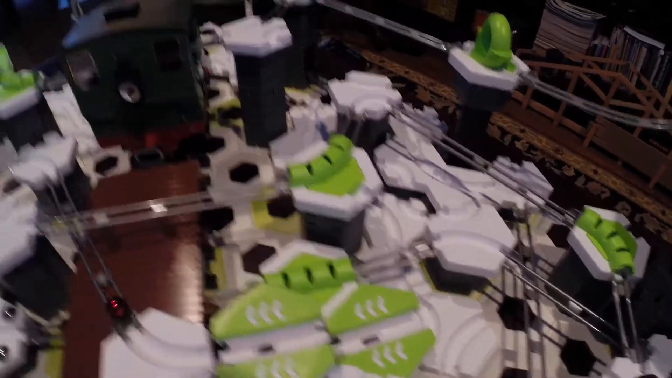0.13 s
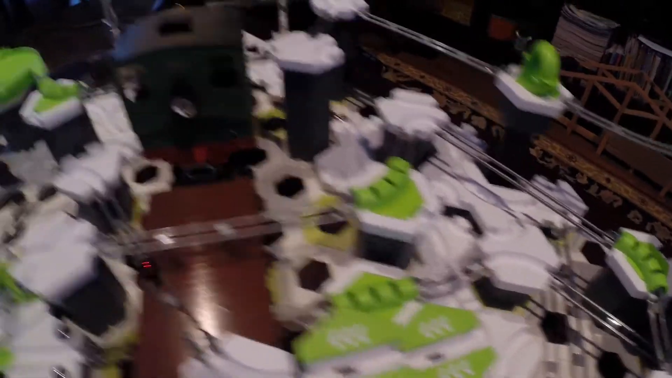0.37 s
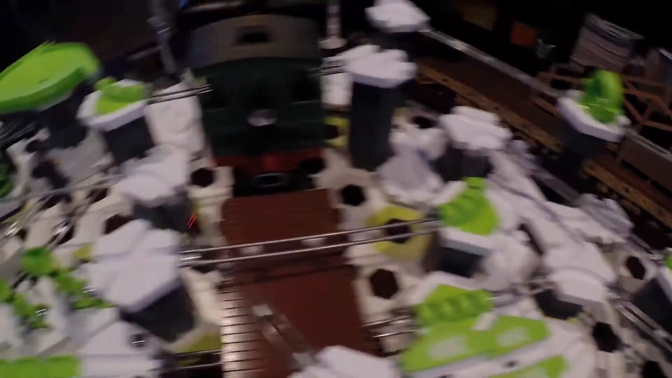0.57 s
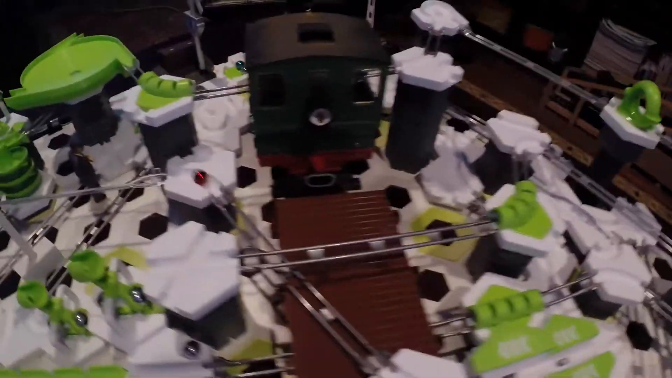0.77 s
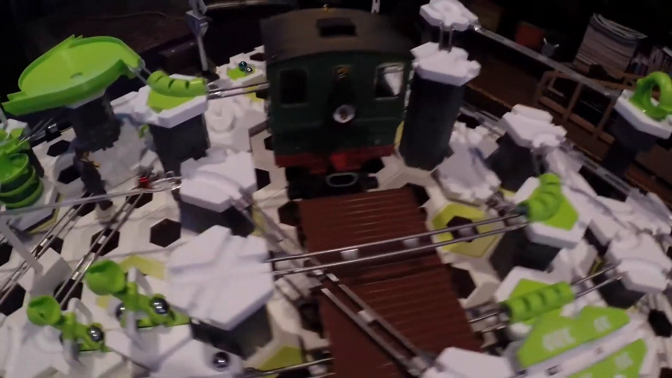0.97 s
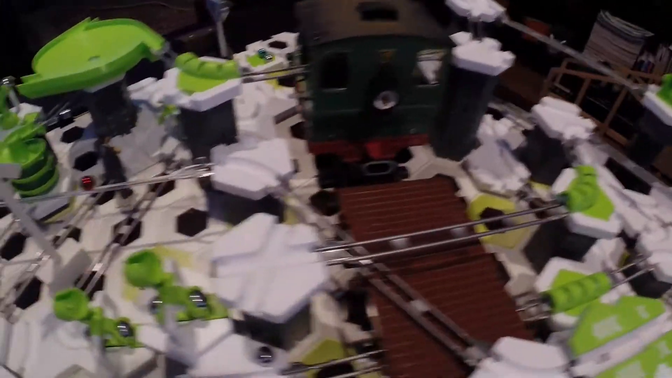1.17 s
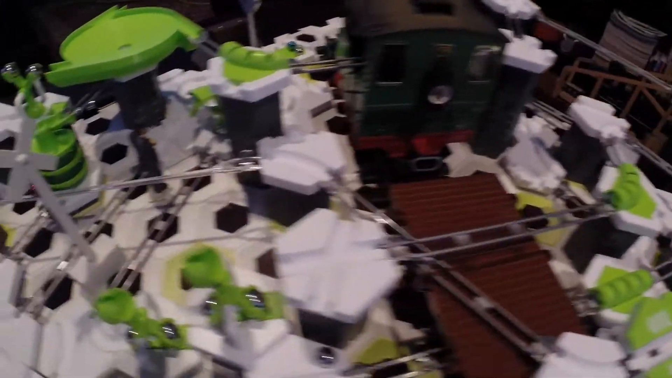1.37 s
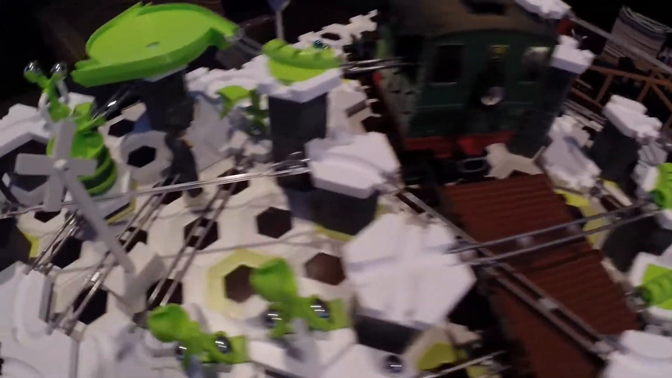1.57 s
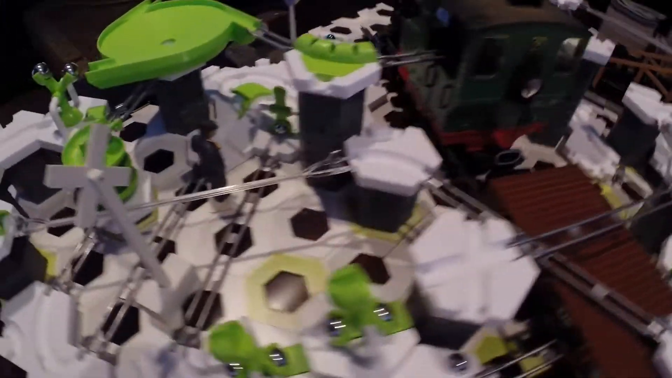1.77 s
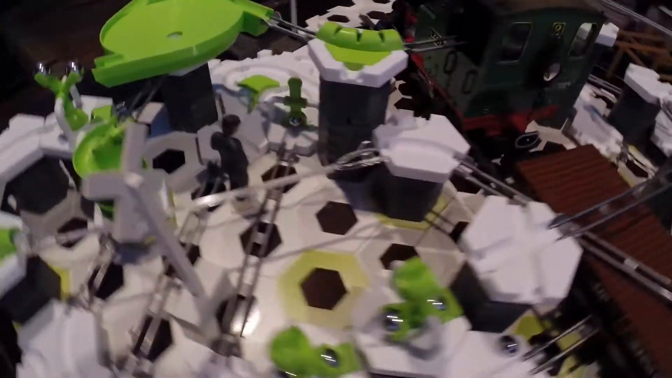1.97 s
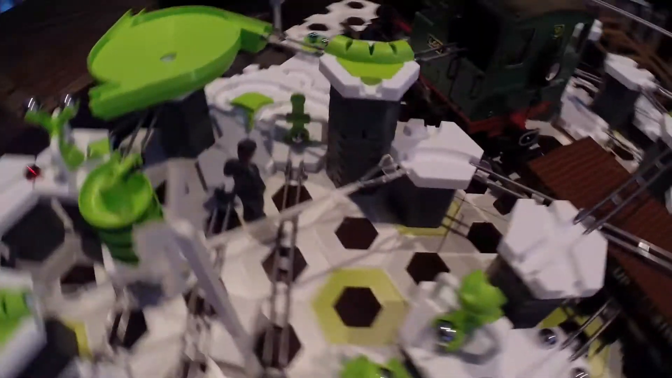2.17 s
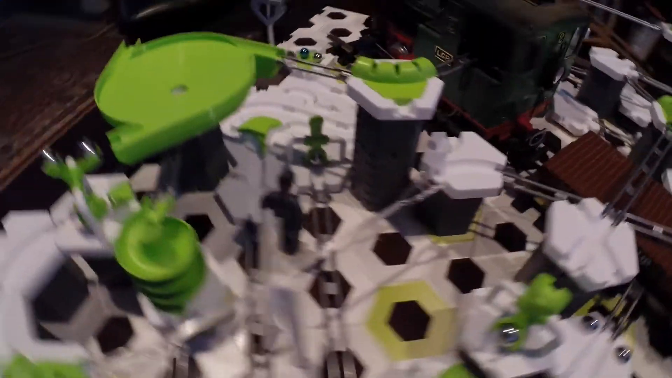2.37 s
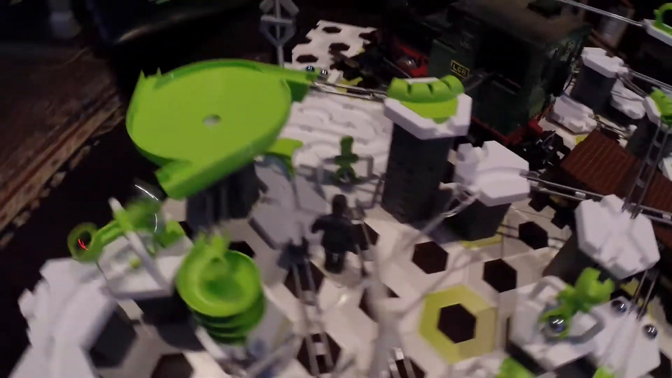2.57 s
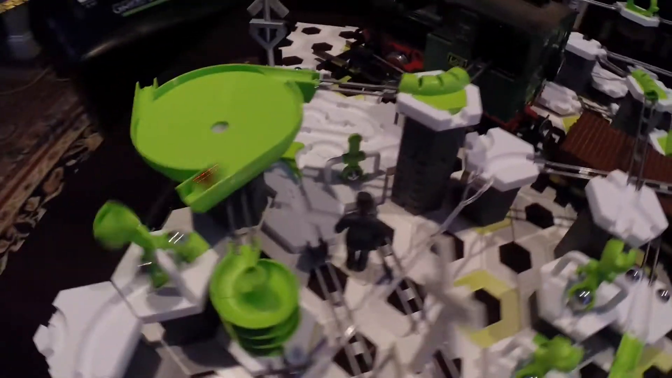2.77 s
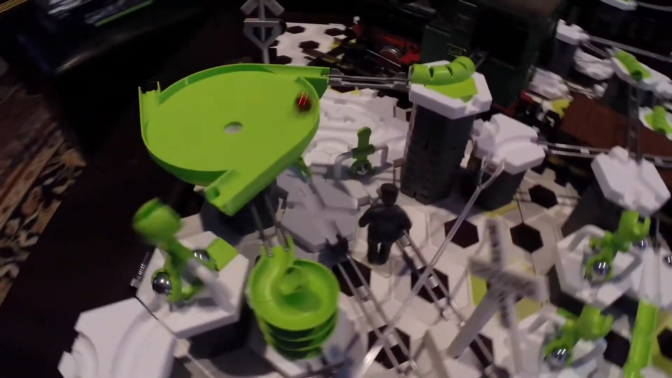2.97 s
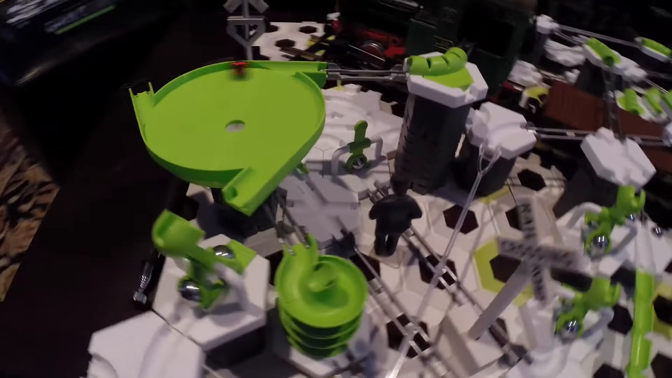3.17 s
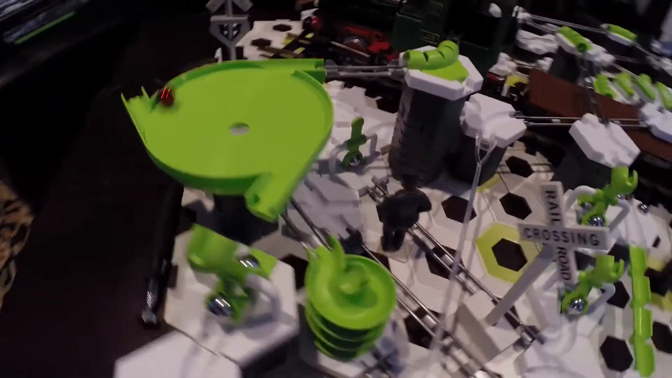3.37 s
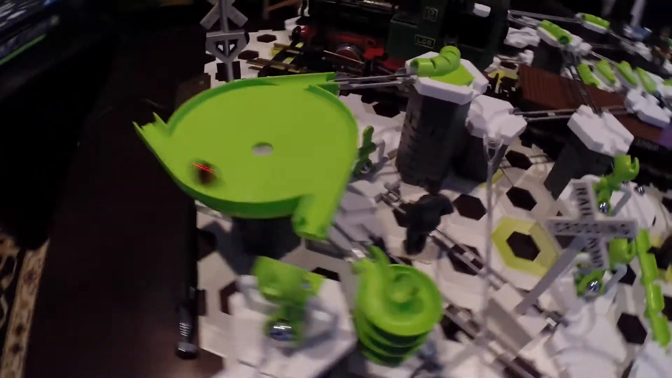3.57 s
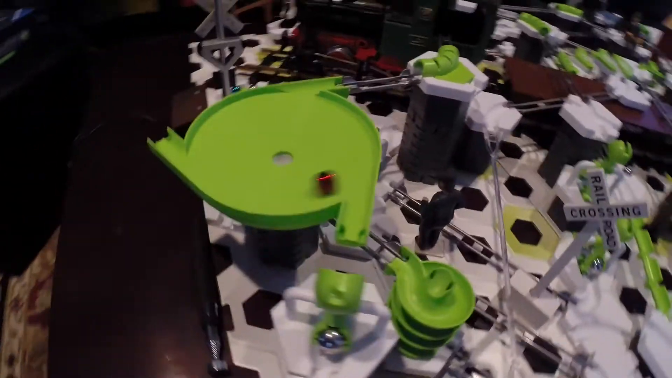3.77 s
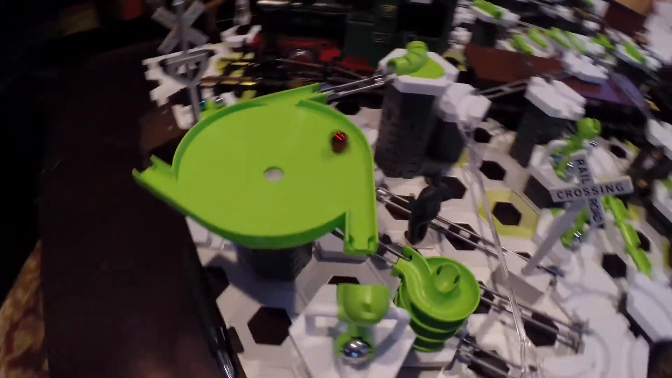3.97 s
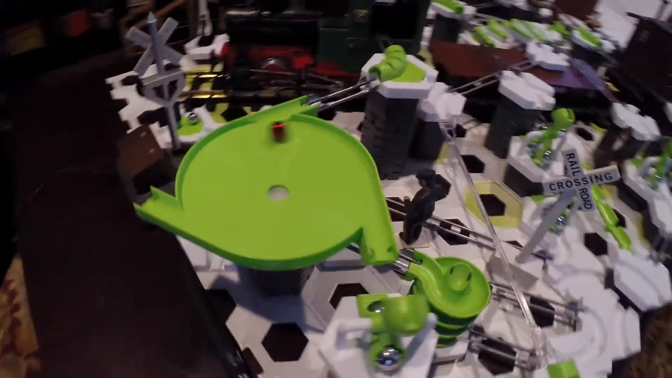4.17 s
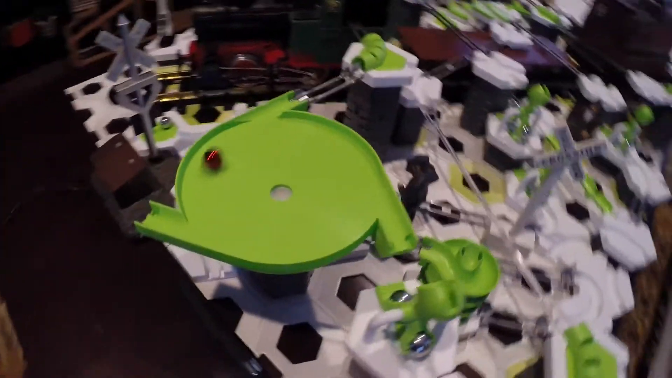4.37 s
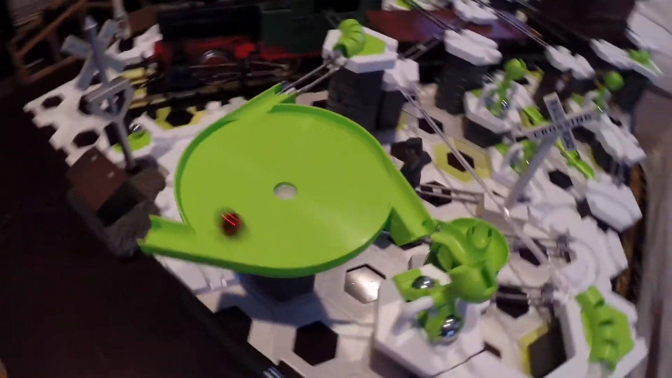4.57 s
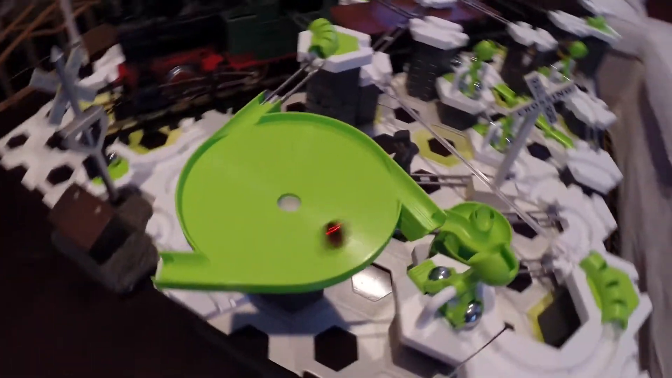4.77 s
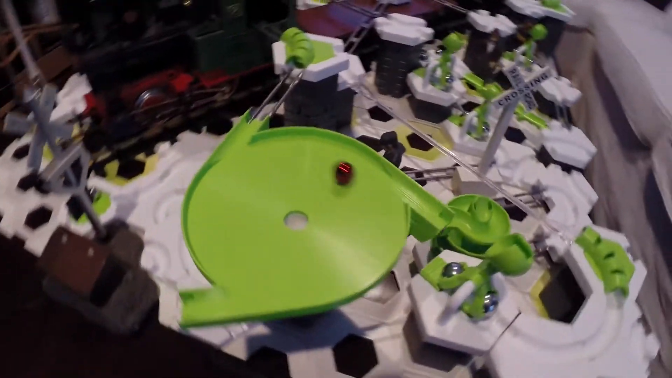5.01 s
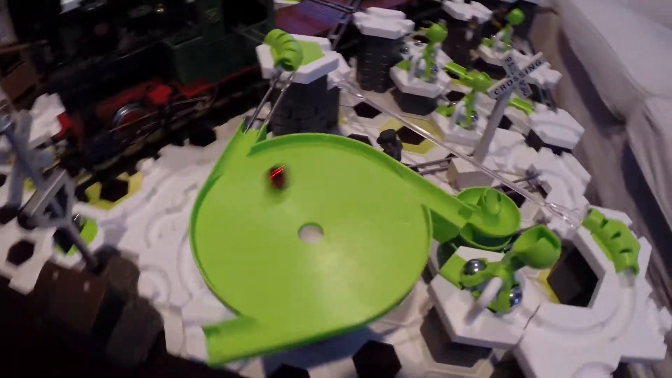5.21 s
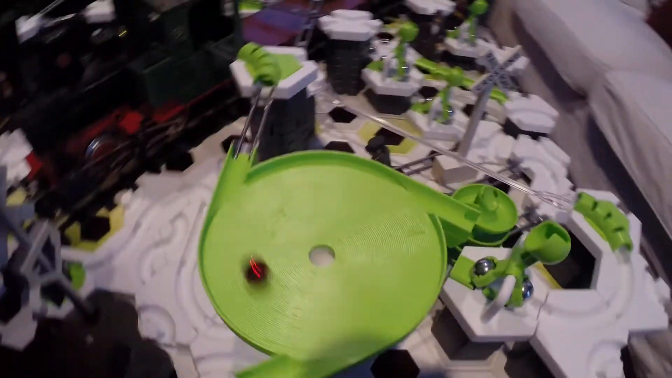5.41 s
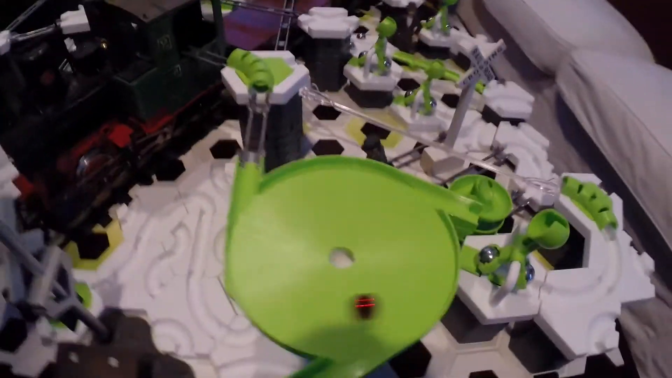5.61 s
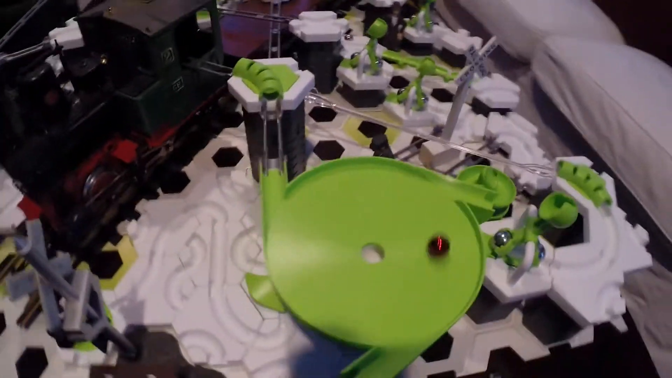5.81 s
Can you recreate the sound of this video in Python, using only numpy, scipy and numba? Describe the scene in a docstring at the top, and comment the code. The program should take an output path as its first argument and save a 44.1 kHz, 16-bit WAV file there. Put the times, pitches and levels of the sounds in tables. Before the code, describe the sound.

A marble rumbles softly along the steel rails of a plastic run, clicking over the joints. It trips a launcher with a sharp clack of steel balls, then lands loudly in a wide plastic bowl. There it circles with a whirr and a thin, swelling ring, knocking against the rim and rattling over bumps. Heard from close by in a quiet, furnished room.

```python
"""Marble run into a plastic bowl

A marble rumbles along the rails of a plastic run, clicks over the joints and trips a launcher with
clacking steel balls. It lands hard in a wide plastic bowl and circles there in a rapid train of tiny
hops that make the thin shell whirr and ring, with knocks and rattles where it meets the rim and bumps.
Heard from close by in a quiet, furnished room."""
import sys
import numpy as np
from scipy import signal
from scipy.fft import rfft, irfft
from scipy.io import wavfile
from scipy.ndimage import uniform_filter1d
from numba import njit

SR = 44100
rng = np.random.default_rng(int(sys.argv[2]) if len(sys.argv) > 2 else 0)


def wav_record(signal):
    """Record a signal, one row per channel, as 16-bit PCM in the file named by sys.argv[1]."""
    frames = np.transpose(np.atleast_2d(signal))
    bounded = np.clip(frames, -1, 1)
    # unit amplitude maps onto the largest positive 16-bit level
    quanta = np.round(bounded * 32767).astype(np.int16)
    wavfile.write(sys.argv[1], SR, quanta)


N = 257984
TIME = np.arange(N) / SR
RING_TIME = TIME[:SR // 4]

# bed of still air: pitch_hz, level_db
ROOM_TONE_EQ = [(12, -35), (20, 4), (133, 0), (427, -8), (746, -18), (811, -17), (932, -11.5), (1270, -8.5),
                (1580, -13), (2270, -18.5), (5530, -24), (12400, -38), (15500, -41)]
# faders for the roll along the track: time_s, rumble_db, singing_db, chatter_db
TRACK_FADERS = [(0.0, -53, -52.5, -82), (0.32, -64.5, -56.5, -68), (0.63, -61.5, -50.5, -62),
                (0.84, -50, -47, -58), (0.99, -64.5, -65.5, -64), (1.4, -63.5, -68.5, -63),
                (1.67, -64.5, -66, -61), (1.84, -53, -70, -56), (2.07, -52, -77, -82),
                (2.28, -49.5, -70, -71), (2.41, -55, -71, -46.5), (2.55, -60, -77, -73),
                (2.77, -61, -68.5, -69), (2.8, -58, -72, -65)]
# hollow rumble of the plastic tiles: pitch_hz, level_db
TILE_EQ = [(60, -15), (130, -2), (200, -15), (350, 0.5), (520, 0.5), (820, 3), (1050, -3), (1500, -1),
           (2200, -12), (5000, -37), (15000, -57)]
# singing of the steel rails: pitch_hz, level_db, t60_s
RAIL_MODES = [(831, 3.5, 0.15), (2065, -23, 0.1), (2130, 22, 0.019), (2270, 17.5, 0.025), (2470, 2, 0.1),
              (2696, 14.5, 0.051), (2700, -8, 0.089)]
# bright chatter on the rails: pitch_hz, level_db
CHATTER_EQ = [(1500, 0), (3000, 2), (4100, 2.5), (4900, 0), (5200, -12), (5600, 1), (6300, -15),
              (9000, -20), (15000, -39)]
# clicks at joints and tiles: start_s, peak_db, pitch_hz, tick_db, knock_db
TRACK_CLICKS = [(0.0184, -39, 2300, -28, 8), (0.0549, -38, 2320, -30, 8), (0.144, -30.5, 4240, -36, -6),
                (0.172, -40.5, 2650, -28, -13), (0.241, -24.5, 2550, -20, -15),
                (0.256, -29.5, 2460, -25, -3), (0.273, -33, 2630, -34, -4), (0.3547, -37.5, 2300, -30, -10),
                (0.4683, -41, 2300, -29, -8), (0.494, -39, 2540, -26, 0), (0.522, -33.5, 2130, -28, 1.5),
                (0.569, -41, 2300, -26, -2), (0.666, -39.5, 2250, -28, -7), (0.725, -23, 2440, -20, -11),
                (0.73, -22, 2250, -24, -8.5), (0.748, -24.5, 2700, -22, -9), (0.7844, -31.5, 2560, -23, -2),
                (0.939, -29.5, 2130, -11.5, -2.5), (0.944, -27.5, 2740, -18, -5),
                (1.04, -42.5, 2700, -8, -11), (1.3, -44, 2500, -7, -8), (1.646, -35, 1900, -20, -6),
                (1.679, -31, 2670, -20, -1.5), (1.734, -41, 2940, -17, -10), (1.766, -34.5, 2700, -21, -10),
                (1.801, -29, 2510, -17.5, -6), (1.838, -36, 1620, -20, -3), (2.034, -33.5, 1760, -22, 3.5),
                (2.088, -39.5, 1880, -25, 3), (2.173, -41, 1800, -20, 8), (2.245, -28.5, 3750, -25, 1.5),
                (2.261, -27.5, 2000, -15.5, 0), (2.514, -27.5, 1140, -22, -2), (2.561, -38, 3450, -8, 1),
                (2.765, -36, 2520, -7, 2.5), (2.776, -33.5, 3300, -9, -2)]
# low knock and bright tick of plastic parts: pitch_hz, level_db
KNOCK_EQ = [(50, -7.5), (150, 8.5), (350, -3.5), (600, 5.5), (1200, 3.5), (1800, -11), (4000, -42.5)]
TICK_EQ = [(3000, -22), (5000, -2), (7000, 0), (9000, -7), (11000, -16), (16000, -22)]

# clacks of the launcher and its steel balls: start_s, peak_db, ring_db, base_db
LAUNCHER_CLACKS = [(2.3602, -24, -11, 0), (2.364, -25.5, 0, -9), (2.381, -31, -7, -3),
                   (2.3894, -9.5, -16, -19.5), (2.409, -23.5, 2, -1.5), (2.429, -33, -1, 5),
                   (2.505, -30, -4, -12), (2.541, -33.5, -2, 0), (2.548, -31, 1, 1),
                   (2.7261, -22, -1.5, -13)]
# ring of the launcher: pitch_hz, level_db, t60_s
LAUNCHER_MODES = [(2300, -2, 0.04), (2480, 8.5, 0.027), (3220, 2, 0.067), (3450, 6, .04), (3700, 5, 0.075),
                  (3900, 0, 0.18), (4200, -3, 0.03), (4600, 1, .04), (4950, 2.5, 0.04), (5700, -2, .04),
                  (6300, -3, 0.039), (6720, 5.5, 0.022)]
# its hard crack and the thump of its base: pitch_hz, level_db
CRACK_EQ = [(200, -30), (800, -16), (2600, -6.5), (3900, 16.5), (5200, -12), (7000, -8), (12000, -38)]
THUMP_EQ = [(60, -7), (160, 4.5), (320, 2.5), (440, 7.5), (600, 1.5), (900, -5.5), (1600, -10),
            (3500, -24), (10000, -50)]

# the landing and its rebounds: start_s, peak_db
LANDING_HITS = [(2.8114, -.8), (2.8203, -10.5), (2.8315, -16)]
# ring of the bowl by where it is struck: pitch_hz, t60_s, inlet_db, outer_db, inner_db
BOWL_MODES = [(795, 0.2, -45, -4, -8), (947, 0.23, -7.5, 1, -13), (1190, 0.097, -24, -20, -23),
              (1600, 0.017, -6, -27, -27), (1702, 0.13, -8, -7.5, -6.5), (1744, 0.075, 5, -7.5, -11.5),
              (2150, 0.026, -26, -1, -3), (2471, 0.079, -14.5, 23.5, 7.5), (2584, 0.033, -27, 18, 21.5),
              (2700, 0.047, 4, 19, 8), (2750, 0.044, -15, 0, -7), (2840, 0.064, 5, 2, 2),
              (2992, 0.032, -1, 12.5, 20), (3118, 0.05, -6, 2, -1.5), (3296, 0.055, -20, 3, 7.5),
              (3534, 0.073, 11, 5, -9), (3552, 0.059, 5, -2, -9), (3750, 0.061, -43, -25, 1),
              (4200, 0.068, -3, -5.5, -0.5), (4370, 0.059, -1, -0.5, -22), (4430, 0.072, -10, -6.5, -17.5),
              (4700, 0.041, -19, -28, -41), (5310, 0.037, -28, -17, -5), (5450, 0.058, -24, -20, -25),
              (5770, 0.041, -32, -19, -39), (6030, 0.056, -34, -16.5, -21), (6780, 0.059, -26, -20.5, -13),
              (7560, 0.043, -4, -26, -35), (8600, 0.027, -25, -24, -34)]
# the wall flexing at the point of impact: pitch_hz, level_db, t60_s
FLEX_MODES = [(865, -12, 0.09), (1250, -38, 0.014), (2470, -29, .012), (3120, 18.5, 0.02),
              (4410, 19.0, 0.014)]
# how hard the marble presses on the bowl as it climbs and dips: time_s, force_db
BOWL_FORCE = [(2.87, 1), (2.94, 3), (2.98, 0), (3.07, 5.5), (3.18, 0.5), (3.21, 6), (3.33, 4.5),
              (3.43, 0.5), (3.47, -6), (3.54, 2), (3.72, 0), (3.75, -5), (3.79, 1.5), (3.86, 4), (3.92, -1),
              (4.04, -6.5), (4.09, 0.5), (4.22, -4.5), (4.26, 2), (4.3, -5.5), (4.34, 5), (4.4, -4),
              (4.45, -4.5), (4.49, 1), (4.59, -5), (4.69, -6), (4.77, 1), (4.93, -1), (4.96, 4.5),
              (5.05, 4.5), (5.13, -4), (5.17, -3), (5.2, 2), (5.47, -0.5), (5.54, 2), (5.64, -1),
              (5.69, -7), (5.76, -0.5), (5.85, 1.5)]
# its way round the bowl: time_s, position_laps
BOWL_LAPS = [(2.81, 0.2), (2.9, 0.37), (3.13, 0.63), (3.48, 0.92), (3.85, 1.38), (4.23, 1.6), (4.61, 1.7),
             (4.92, 2.33), (5.29, 2.84), (5.65, 3.2), (5.85, 3)]
# the short push that each contact radiates directly: pitch_hz, level_db
PUSH_EQ = [(40, -27), (100, -21), (140, 7.5), (195, -10.5), (240, -8), (300, -11.5), (520, -5), (950, 2.5),
           (1400, -11), (2000, -15), (3000, -8.5), (4200, -22.5), (6000, -37), (16000, -71.5)]
# the shell's four mode families: low_hz, high_hz
FAMILY_BANDS = [(1600, 2000), (2000, 3000), (3000, 4800), (4800, 9000)]
# fader for the lowest family, a thin tone near 1.7 kHz: time_s, level_db
LOW_RING_FADER = [(2.87, -50), (2.89, -54), (3.02, -38), (3.08, -54), (3.19, -50), (3.21, -41.5),
                  (3.34, -42.5), (3.38, -55), (3.55, -57), (3.63, -41), (3.81, -54.5), (4.11, -43.5),
                  (4.2, -55), (4.49, -49), (4.59, -63), (4.8, -41), (4.94, -54), (5.03, -41), (5.23, -46),
                  (5.27, -51), (5.42, -43.5), (5.55, -45), (5.57, -56), (5.68, -60), (5.74, -44.5),
                  (5.85, -44)]
# how each higher family answers the marble: level_db, db_per_force_db, drift_db_per_s, nodal_line_db
FAMILY_RESPONSE = [(-42, 1.2, -.5, -2), (-48.5, 1.65, -.5, -0.5), (-61.5, 1.7, 0, -2)]
# the marble damps the shell, one value a family: t60_ratio
FAMILY_RING_KEPT = [1, .85, .55, .7]
# how far the marble's weight bends the pitch, one value a family: detune_share
FAMILY_DETUNE = [0.072, .25, 0.12, 0.086]
# dense, short ring of the bowl's high modes: pitch_hz, level_db
SHELL_EQ = [(1500, -56), (2600, 26), (3300, 13), (4300, 6.5), (5000, -16), (7000, -3), (8800, -33),
            (10000, -63), (15000, -54)]
# fine hiss of the running surface: pitch_hz, level_db
HISS_EQ = [(3000, -37), (4500, 5), (5400, -1), (6200, -2), (7200, -7), (8700, -11.5), (9800, -33),
           (15000, -22)]
# sharp little ticks under the marble: start_s, peak_db, top_treble_db
BOWL_TICKS = [(2.943, -32, -16), (3.044, -29.5, -14), (3.07, -23.5, -14), (3.18, -45, 13),
              (3.206, -30, -13), (3.406, -39, -10), (4.4414, -42, 12)]
# knocks on the rim and on bumps: start_s, peak_db
BOWL_KNOCKS = [(3.0471, -28), (3.06, -26), (3.0815, -19), (3.2052, -22), (3.2195, -14), (3.252, -25),
               (3.275, -26), (3.835, -15), (3.8777, -22), (3.93, -25), (3.948, -28), (4.0856, -23.5),
               (4.113, -25), (4.2428, -30), (4.267, -29), (4.3461, -22), (5.0365, -24), (5.0903, -28),
               (5.147, -27), (5.213, -26)]
# runs of even bounces: start_s, length_s, gap_s, first_peak_db, last_peak_db, tilt_db_per_octave
BOWL_RATTLES = [(3.8425, .058, .0048, -22, -28, 0), (4.9503, .108, .005, -22, -22, 7)]
# tail returned by furniture and walls: pitch_hz, level_db
REVERB_EQ = [(60, -22.5), (300, 1.5), (3000, -6.0), (7000, -9.0), (15000, -4.0)]

SPIRAL_S = [3.67, 4.9]  # the marble passes from the outer surface to the inner
NODAL_LINES, LOBE_SHARPNESS = 3, 0.97  # sharper lobes make narrower swells between the lines
HOP_HZ, HOP_JITTER, HOP_SAG_PER_S = 399.3, .33, .15  # base values; the rate sags as the marble slows
DETUNE_START, DETUNE_PER_S, DETUNE_LAP_SWING = -0.032, 0.02, 0.011  # each family takes its share


def undb(db):
    """Decibels to gain."""
    return np.exp(np.asarray(db) * (np.log(10) / 20))


def unit(x):
    """Scale to rms 1."""
    return x / np.sqrt(np.mean(x ** 2))


def peaked(x, db):
    """Scale to a peak level."""
    return x * undb(db) / np.abs(x).max()


def steady(x, window_s):
    """Ride the gain to hold rms near 1 in every short stretch."""
    return x / np.sqrt(uniform_filter1d(x ** 2, int(window_s * SR)) + 1e-12)


def faders(table):
    """Each dB column of a table as a gain for every sample."""
    times, *columns = np.transpose(table)
    return [undb(np.interp(TIME, times, column)) for column in columns]


def wander(rate_hz):
    """Random drift with rms 1."""
    knots = np.arange(0, TIME[-1] + 1 / rate_hz, 1 / rate_hz)
    return unit(np.interp(TIME, knots, rng.standard_normal(len(knots))))


def add(out, start_s, sound):
    """Mix a sound in at its cue."""
    start = max(int(start_s * SR), 0)
    out[start:start + len(sound)] += sound[:N - start]


def through(x, response):
    """Play x through an impulse response."""
    return signal.fftconvolve(x, response)[:len(x)]


def colour(eq, size=4096):
    """Minimum-phase impulse response of an EQ curve."""
    hz, db = np.transpose(eq)
    bins_hz = np.fft.rfftfreq(size, 1 / SR)
    log_gain = np.log(undb(np.interp(np.log(bins_hz + 1), np.log(hz), db)))
    cepstrum = irfft(log_gain)
    cepstrum[1:size // 2] *= 2
    cepstrum[size // 2 + 1:] = 0
    return np.pad(irfft(np.exp(rfft(cepstrum))), (0, len(RING_TIME) - size))


def fade(t60):
    """Exponential decay, 60 dB down after t60 seconds."""
    return np.exp(-np.log(1000) * RING_TIME / t60)


def burst(eq, t60):
    """Many close modes dying together: a coloured, decaying noise."""
    return unit(through(rng.standard_normal(len(RING_TIME)) * fade(t60), colour(eq)))


def ring(modes):
    """A struck body: one decaying sine for each mode."""
    return sum(undb(db) * fade(t60) * np.sin(2 * np.pi * hz * RING_TIME) for hz, db, t60 in modes)


def soften(x, hz):
    """Plastic yields, so a contact lasts a moment and loses its top."""
    return signal.sosfilt(signal.butter(2, min(hz, .45 * SR), fs=SR, output="sos"), x)


def room_tone():
    """Still air lays a faint, dark bed of noise under everything."""
    return undb(-57.5) * unit(through(rng.standard_normal(N), colour(ROOM_TONE_EQ)))


def hops(rate_hz, jitter, scatter_db, grit_db):
    """A rolling marble leaves the surface and falls back again and again; fine grit fills the gaps."""
    phase = np.cumsum(rate_hz * np.exp(jitter * wander(400))) / SR
    contacts = np.diff(np.floor(phase), prepend=0) * undb(scatter_db * np.tanh(wander(167)))
    return unit(contacts) + undb(grit_db) * rng.standard_normal(N)


def track_roll(end_s=2.56):
    """The marble rumbles over hollow tiles and makes the steel rails sing and chatter."""
    tile_gain, rail_gain, chatter_gain = faders(TRACK_FADERS)
    lumps = undb(2.5 * np.tanh(wander(45)))
    contacts = steady(hops(220, jitter=.6, scatter_db=8, grit_db=-3), window_s=.09) * lumps
    contacts *= np.interp(TIME - end_s, [0, .05], [1, 0])
    rumble = undb(-3) * tile_gain * unit(through(contacts, colour(TILE_EQ)))
    singing = undb(-3) * rail_gain * unit(soften(through(contacts, ring(RAIL_MODES)), hz=4500))
    grit = through(contacts, fade(0.037)) * rng.standard_normal(N)
    chatter = undb(-3.5) * chatter_gain * unit(through(grit, colour(CHATTER_EQ)))
    return rumble + singing + chatter


def track_clicks():
    """Each joint or tile answers with a snap, a ping at its own resonance, a low knock and a tick."""
    out = np.zeros(N)
    for start_s, peak_db, hz, tick_db, knock_db in TRACK_CLICKS:
        body_eq = [(hz / 6, -25), (hz / 2.84, -8), (hz, 0), (hz * 1.53, -6), (hz * 2, -4),
                   (hz * 3, -22), (hz * 5, -38)]
        ping = undb(-5) * unit(ring([(hz * .96, -3, .03), (hz * 1.03, 0, .04), (hz * 2.1, -3, .035)]))
        snap = burst(body_eq, t60=0.028) + undb(-5) * burst(body_eq, t60=0.1)
        knock = undb(knock_db) * burst(KNOCK_EQ, t60=0.092)
        tick = undb(tick_db) * burst(TICK_EQ, t60=0.11)
        add(out, start_s, peaked(soften(snap + ping, hz=4870) + knock + tick, peak_db))
    return out


def launcher():
    """Steel and plastic clack: a hard crack, a ring near 4 kHz, and a thump and a tick in the base."""
    out = np.zeros(N)
    for start_s, peak_db, ring_db, base_db in LAUNCHER_CLACKS:
        modes = [(hz, db + 2 * rng.standard_normal(), t60) for hz, db, t60 in LAUNCHER_MODES]
        crack = soften(burst(CRACK_EQ, t60=0.0069), hz=5200)
        base = burst(THUMP_EQ, t60=0.1) + undb(-9.5) * burst(TICK_EQ, t60=0.17)
        clack = crack + undb(ring_db) * unit(ring(modes)) + undb(base_db) * base
        add(out, start_s, peaked(clack, peak_db))
    return out


def disperse(x, hz, width_hz):
    """Bending waves smear a blow over a few cycles: an all-pass holds back the band around hz."""
    radius = np.exp(-np.pi * width_hz / SR)
    poles = np.array([1, -2 * radius * np.cos(2 * np.pi * hz / SR), radius ** 2])
    return signal.lfilter(poles[::-1], poles, x)


def thin_out(x):
    """The small open shell radiates little bass."""
    return signal.sosfilt(signal.butter(3, 600, "high", fs=SR, output="sos"), x)


def bowl_landing():
    """The landing flexes the wall, rings the whole bowl and thuds faintly in the tower beneath."""
    out = np.zeros(N)
    inlet = unit(ring([(hz, db, t60) for hz, t60, db, *_ in BOWL_MODES]))
    flex = unit(disperse(unit(ring(FLEX_MODES)), hz=3300, width_hz=530))
    shell = thin_out(soften(inlet + undb(2.5) * flex, hz=6500))
    tick = undb(-21) * burst(TICK_EQ, t60=0.11)
    thud = undb(-24.5) * burst([(50, -12), (130, 7), (220, -3), (500, -16), (1500, -35)], t60=0.17)
    for start_s, peak_db in LANDING_HITS:
        add(out, start_s, peaked(shell + tick + thud, peak_db))
    return out


def bouncing(settle_s):
    """A knock sets the marble bouncing: 1 at the hit, dying away as it settles."""
    knocks_s = np.array([0] + [start_s for start_s, _ in BOWL_KNOCKS])
    latest_s = knocks_s[np.searchsorted(knocks_s, TIME, "right") - 1]
    return np.exp(-(TIME - latest_s) / settle_s)


def surface_grip(flight_s, duck_db):
    """A gain that ducks before each knock and through each rattle, as the marble is thrown clear."""
    grip = np.ones(N)
    flights = [(s - flight_s, s) for s, _ in BOWL_KNOCKS]
    flights += [(s - flight_s, s + length_s) for s, length_s, *_ in BOWL_RATTLES]
    for start_s, end_s in flights:
        grip[int(start_s * SR):int(end_s * SR)] = undb(duck_db)
    return uniform_filter1d(grip, size=128)


@njit
def resonate(x, hz, t60):
    """One mode whose pitch may glide while it rings."""
    y, state, pole = np.empty(len(x)), 0j, 0j
    for i in range(len(x)):
        if i % 16 == 0:
            pole = np.exp((2j * np.pi * hz[i] - np.log(1000) / t60) / SR)
        state = state * pole + x[i]
        y[i] = state.imag
    return y


def family_swells(force, grip, laps, age_s):
    """A gain per mode family: the lowest rides its fader, the rest follow force and nodal lines."""
    antinode = (np.sin(np.pi * NODAL_LINES * laps) ** 2) ** LOBE_SHARPNESS
    gains = [undb(1) * faders(LOW_RING_FADER)[0]]
    for db, growth, db_per_s, node_db in FAMILY_RESPONSE:
        lobes = np.sqrt(antinode + undb(node_db) ** 2 * (1 - antinode))
        gains.append(grip * undb(db + db_per_s * age_s) * force ** growth * lobes)
    return gains


def shell_ring(contacts, gains, laps, age_s):
    """Hops ring the shell; the marble's weight detunes it, steadily as it spirals in and once a lap."""
    out = np.zeros(N)
    inward = np.interp(TIME, SPIRAL_S, [0, 1])
    detune = 1 + DETUNE_START + DETUNE_PER_S * age_s + DETUNE_LAP_SWING * np.cos(2 * np.pi * laps)
    for gain, (low_hz, high_hz), share, kept in zip(gains, FAMILY_BANDS, FAMILY_DETUNE, FAMILY_RING_KEPT):
        tuning = detune ** share * (1 + 0.006 * wander(25))
        family = np.zeros(N)
        for hz, t60, _, outer_db, inner_db in BOWL_MODES:
            if low_hz <= hz < high_hz:
                # every mode has nodal lines of its own: a random drift lets them take turns
                drive_db = outer_db + (inner_db - outer_db) * inward + 4 * np.tanh(wander(21))
                family += resonate(contacts * undb(drive_db), hz * tuning, float(t60) * kept)
        out += gain * steady(soften(family, hz=high_hz * 1.3), window_s=.12)
    return out


def surface_grit(contacts, spray_gain, hiss_gain):
    """Each contact meets fresh texture: a gritty spray, a hiss and a swish sinking as the roll slows."""
    grit = through(contacts, fade(0.011)) * rng.standard_normal(N)
    spray = undb(-5) * unit(soften(through(grit, colour(SHELL_EQ)), hz=4500))
    hiss = undb(-4.5) * unit(through(grit, colour(HISS_EQ)))
    swish_hz = np.interp(TIME, [3, 4.4, 5], [8700, 8200, 6800])
    swish = undb(-14) * unit(resonate(grit, swish_hz, t60=0.0083))
    return spray_gain * spray + hiss_gain * (hiss + swish)


def bowl_roll():
    """The circling marble drums on the shell in tiny hops: a direct whirr, a ring and fine grit."""
    age_s = np.maximum(TIME - LANDING_HITS[0][0], 0)
    laps = np.interp(TIME, *np.transpose(BOWL_LAPS))
    bounce = bouncing(settle_s=.06)
    grip = surface_grip(flight_s=.013, duck_db=-6)
    lumps_db = 2 * np.tanh(wander(45))  # the surface is not quite smooth
    force = faders(BOWL_FORCE)[0] * undb(bounce + lumps_db)  # a knock adds 1 dB
    # a harder contact or a knock throws the marble higher: its hops grow slower and more even
    rate_hz = HOP_HZ / force ** .22 * np.exp(-HOP_SAG_PER_S * age_s - .35 * bounce)
    jitter = HOP_JITTER / force ** .4 * np.exp(-1.6 * bounce)
    # a longer flight ends in a harder contact
    contacts = hops(rate_hz, jitter, scatter_db=3.5, grit_db=-16) / np.sqrt(rate_hz)
    pushes = -unit(through(contacts * grip, colour(PUSH_EQ)))
    whirr = undb(-43.5 + 0.83 * age_s) * force ** 0.65 * pushes
    gains = family_swells(force, grip, laps, age_s)
    ringing = shell_ring(contacts, gains, laps, age_s)
    grit = surface_grit(contacts, spray_gain=gains[2], hiss_gain=gains[3])
    return (whirr + ringing + grit) * np.interp(TIME, [2.815, 2.85], [0, 1])


def bowl_ticks():
    """Sharp little ticks under the marble, each a pinch of bright noise."""
    out = np.zeros(N)
    for start_s, peak_db, top_db in BOWL_TICKS:
        tick = burst([(4000, 11.5), (8000, 10.0), (15000, top_db)], t60=0.013)
        add(out, start_s, peaked(tick, peak_db))
    return out


def surface_ring(at_s, tilt_db):
    """The bowl's ring, struck where the marble runs at that moment and tilted by tilt_db per octave."""
    return unit(ring([(hz, np.interp(at_s, SPIRAL_S, [outer_db, inner_db]) + tilt_db * np.log2(hz), t60)
                      for hz, t60, _, outer_db, inner_db in BOWL_MODES]))


def bowl_knocks(longest_rebound_s=0.0068, rebound_db=-8):
    """The marble hits the rim or a bump, rings the running surface and bounces once more."""
    out = np.zeros(N)
    push = undb(-7.5) * thin_out(-unit(colour(PUSH_EQ)))
    for start_s, peak_db in BOWL_KNOCKS:
        snap = undb(-4.5) * burst(SHELL_EQ, t60=0.025)
        knock = soften(surface_ring(start_s, tilt_db=-4.5) + push + snap, hz=7300)
        add(out, start_s, peaked(knock, peak_db))
        rebound_s = longest_rebound_s * rng.uniform(0.69, 1.0)
        add(out, start_s + rebound_s, peaked(knock, peak_db + rebound_db))
    return out


def bowl_rattles(jitter=.12, scatter_db=1.2):
    """Thrown up by a bump, the marble bounces in a quick, even run of sharp contacts with choked rings."""
    out = np.zeros(N)
    push = -unit(colour(PUSH_EQ))
    for start_s, length_s, gap_s, first_db, last_db, tilt_db in BOWL_RATTLES:
        shell = undb(-1) * unit(surface_ring(start_s, tilt_db) * fade(t60=.07))
        at_s, end_s = start_s, start_s + length_s
        while at_s < end_s:
            lag, strength = rng.standard_normal(2)
            bounce = soften(push + shell + undb(-6) * burst(SHELL_EQ, t60=0.016), hz=6500)
            peak_db = np.interp(at_s, [start_s, end_s], [first_db, last_db]) + scatter_db * strength
            add(out, at_s, peaked(bounce, peak_db))
            at_s += gap_s * np.exp(jitter * lag)
    return out


def room(x, wet_db, t60):
    """Furniture and walls return a short, dull tail."""
    attack = np.clip(RING_TIME / 0.0033, 0, 1) ** 2
    tail = burst(REVERB_EQ, t60) * attack
    return x + undb(wet_db) * through(x, tail / np.linalg.norm(tail))


def scene():
    """Track, launcher and bowl in the quiet room, in mono."""
    run = track_roll() + track_clicks() + launcher()
    bowl = bowl_landing() + bowl_knocks() + bowl_ticks() + bowl_rattles() + bowl_roll()
    return (room(run + bowl, wet_db=-11.0, t60=0.22) + room_tone())[None]


def record(dry):
    """A steep low-pass trims the air above 15.4 kHz."""
    return signal.sosfilt(signal.ellip(8, .2, 70, 15400, fs=SR, output="sos"), dry)


dry = scene()
out = record(dry)
wav_record(out)
```